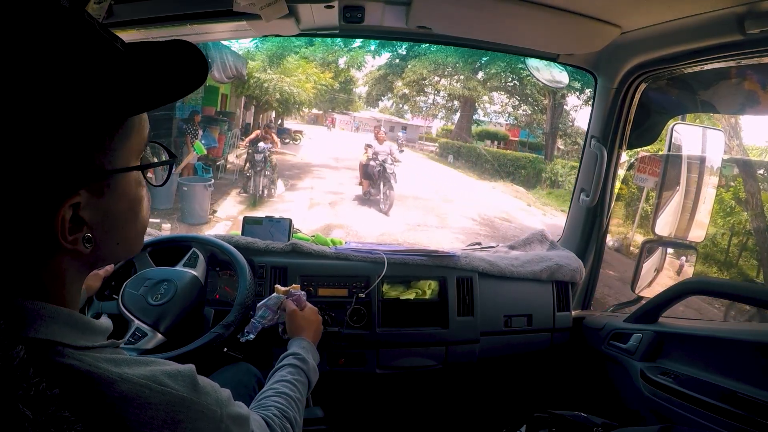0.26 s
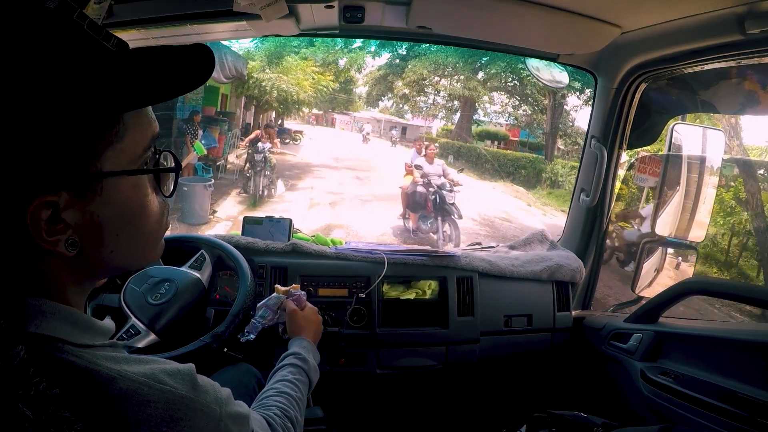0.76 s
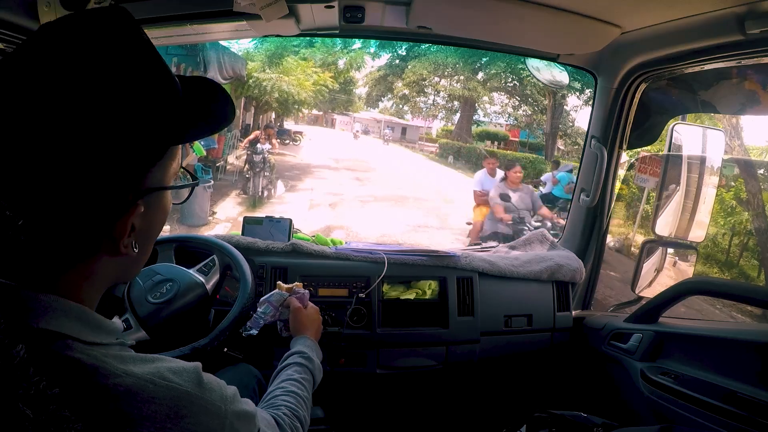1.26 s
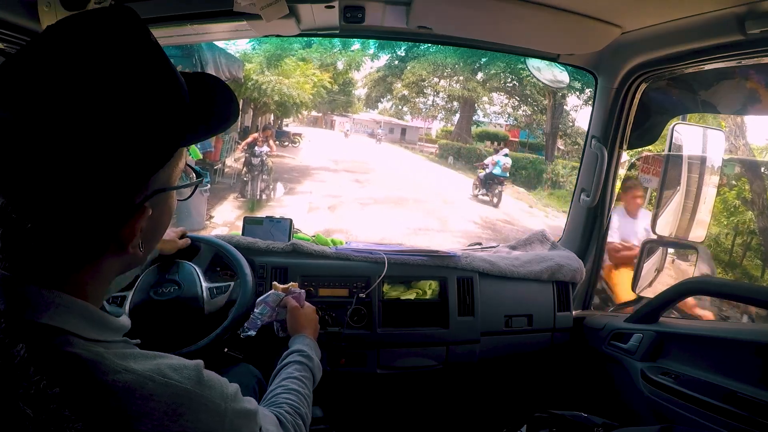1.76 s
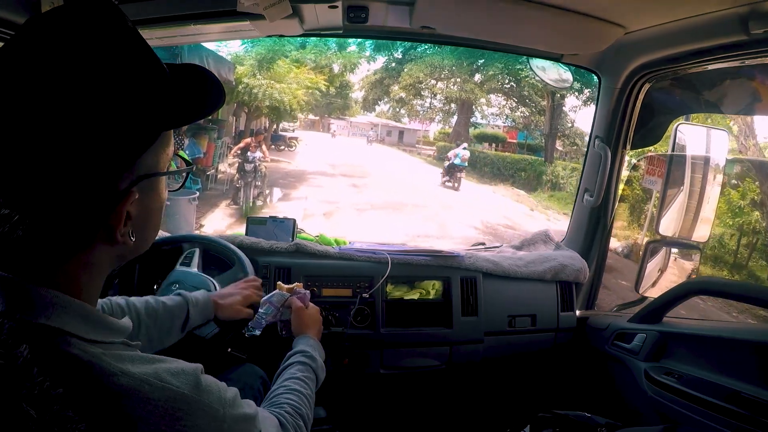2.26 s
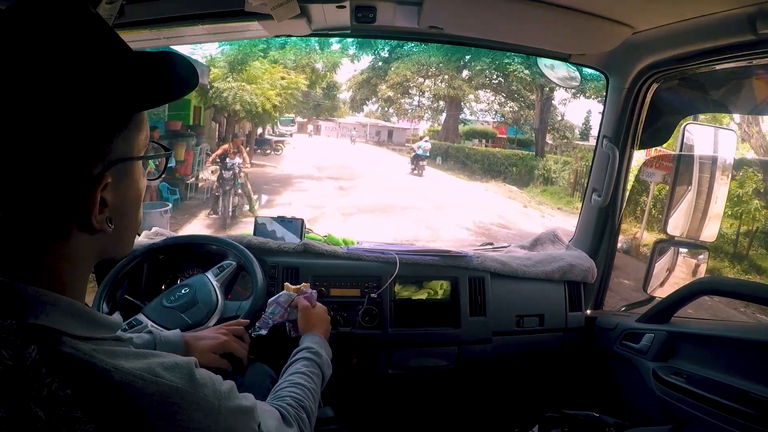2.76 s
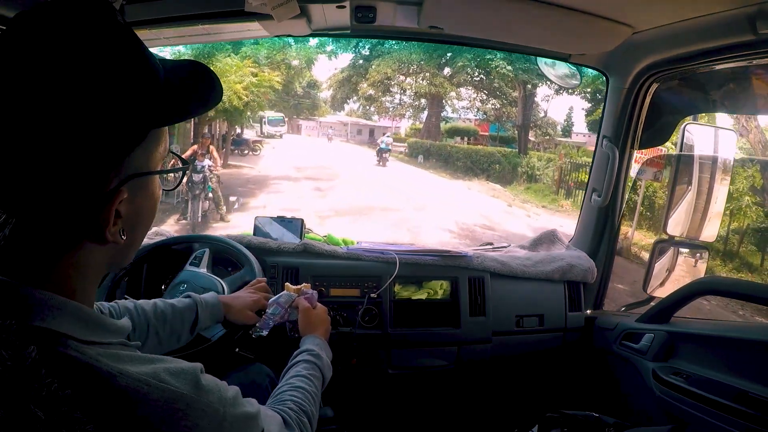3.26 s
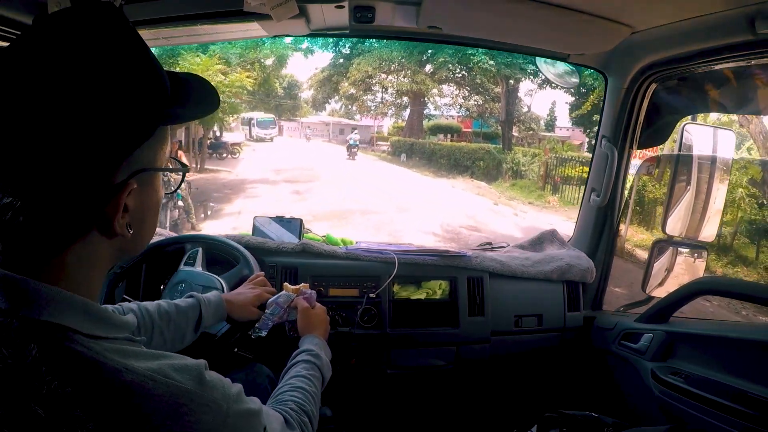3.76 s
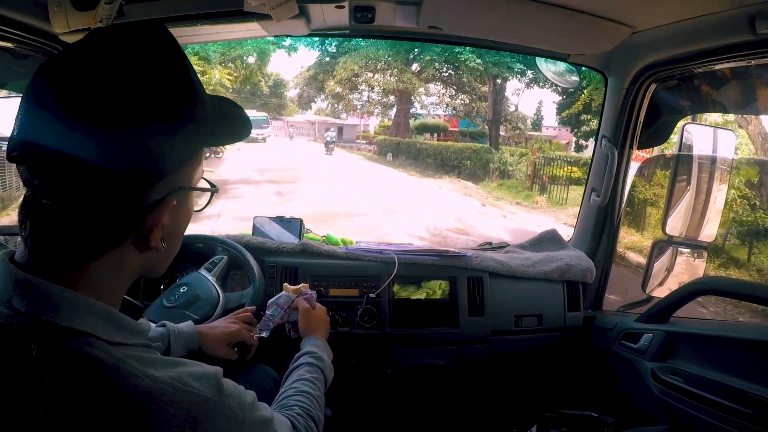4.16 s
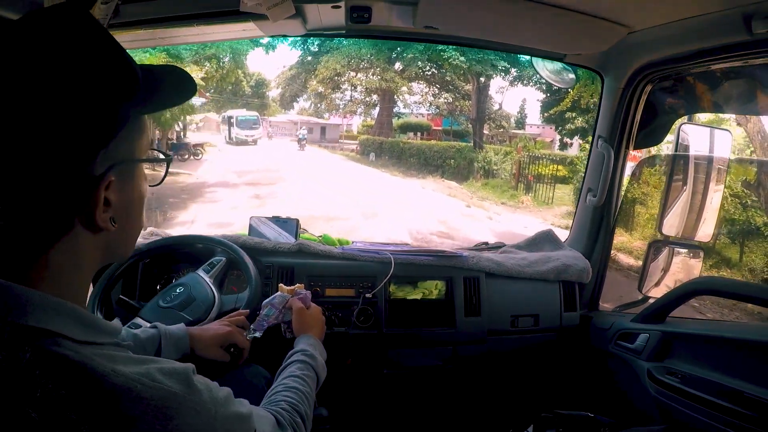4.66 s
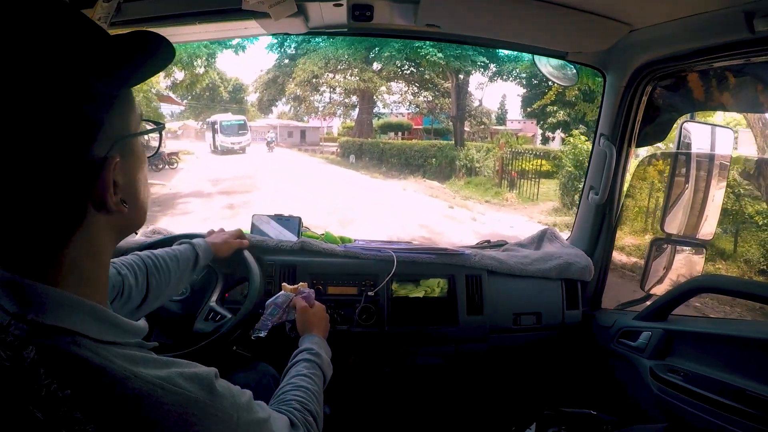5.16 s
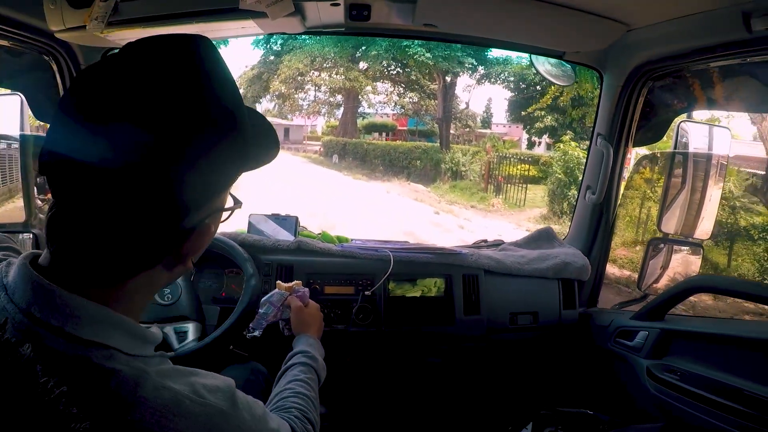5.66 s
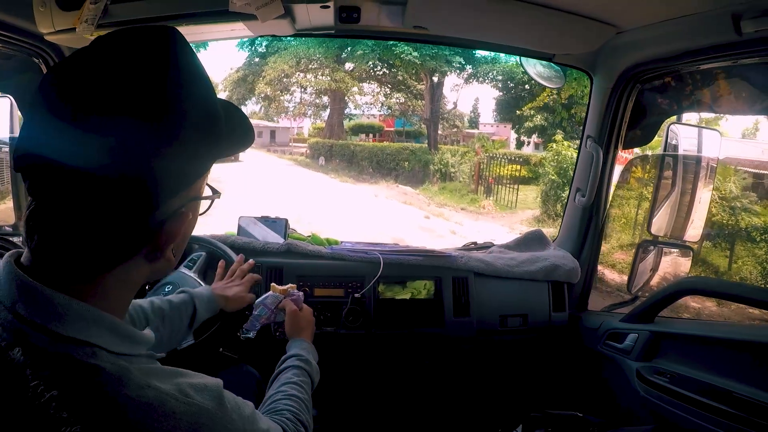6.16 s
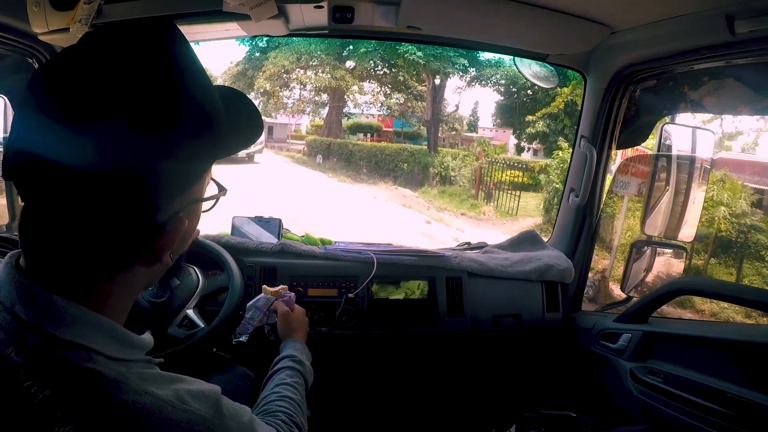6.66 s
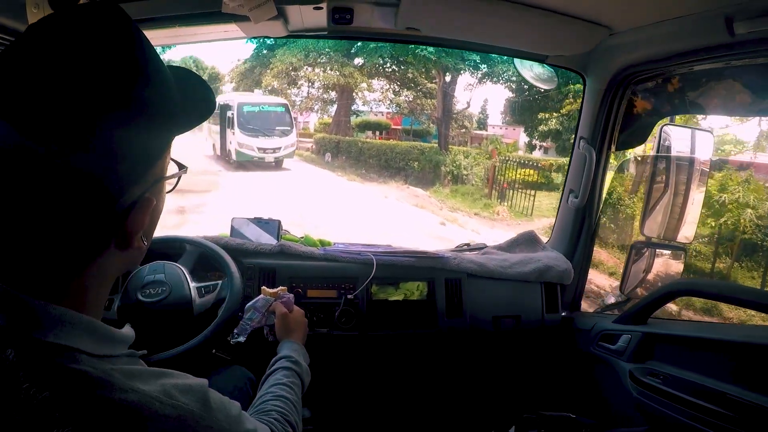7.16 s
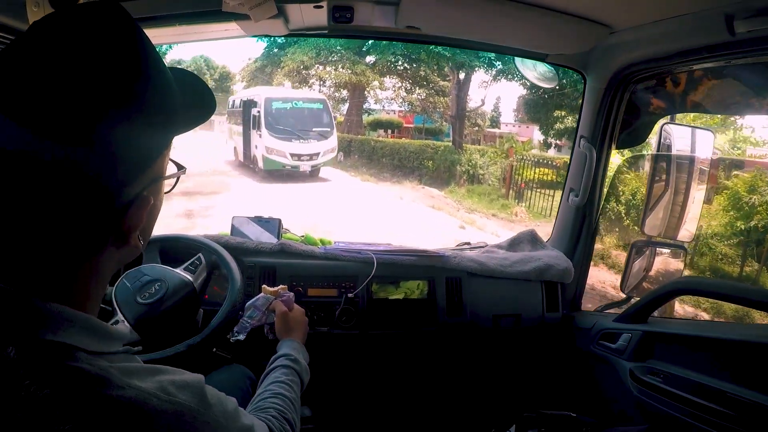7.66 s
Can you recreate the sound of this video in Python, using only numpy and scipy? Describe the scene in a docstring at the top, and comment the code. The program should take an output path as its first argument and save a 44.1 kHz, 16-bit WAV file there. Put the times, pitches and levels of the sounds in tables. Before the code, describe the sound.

A diesel truck creeps over rough dirt, heard from within the cab. The engine runs steadily just above idle, its heavy low throb surging slightly as it pulls and easing as it coasts. Rumble, airy hum and tyre hiss surround it, the hum fading away. Bright dry rattles scatter through the first half, dull body thuds arrive mid-way, then a short rattle cluster; the last part is smoother, with a faint squeak at the end.

```python
"""A four-cylinder diesel engine just above idle booms in a truck cab as it creeps along a dirt road.
Firing orders are sines lifted by the cab; knock is clicks and clatter ringing the engine cover.
A whine and an airy hum sit on top, while shaped noise makes the road rumble and the tyre hiss.
Loose trim rattles in noise bursts, ruts set panels ringing, and a few thin tones squeak.
Two close microphone ports hear it all, partly alike and partly not, depending on pitch."""
import sys
import numpy as np
from scipy import signal
from scipy.fft import rfft, irfft, next_fast_len
from scipy.io import wavfile

SR = 44100
rng = np.random.default_rng(int(sys.argv[2]) if len(sys.argv) > 2 else 0)


def unload_audio(sound):
    """Save the sound as a 16-bit wav file, at the path given as the first command line argument."""
    columns = np.transpose(np.atleast_2d(sound))
    # keep every value between -1 and 1, then stretch to whole-number steps
    steps = np.round(np.clip(columns, -1, 1) * 32767)
    wavfile.write(sys.argv[1], SR, steps.astype(np.int16))


def field_ratio(decibels):
    """Amplitude ratio for a level in dB (20 dB per decade); scalars and array-likes work."""
    return 10 ** (np.asarray(decibels, dtype=float) / 20)


N = 349272  # length in samples


def rms_one(x):
    """Scale to unit rms."""
    return x / np.sqrt(np.mean(x ** 2) + 1e-20)


def in_time(rows):
    """Columns of a time curve, read at every sample."""
    s, *columns = np.transpose(rows)
    return [np.interp(np.arange(N) / SR, s, c) for c in columns]


def at_hz(rows, hz):
    """Columns of a spectrum, read at the given pitches on a log-frequency axis."""
    f, *columns = np.transpose(rows)
    return [np.interp(np.log(hz + 1), np.log(f), c) for c in columns]


def drift(rate):
    """Random wandering of rms 1: noise smoothed twice above rate (Hz), made at every 40th sample."""
    r = np.exp(-80 * np.pi * rate / SR)
    noise = rng.standard_normal(N // 40 + 2002)
    smooth = signal.lfilter([1], [1, -2 * r, r * r], noise)
    slow = rms_one(smooth[2000:])  # skip the filter's start
    return np.interp(np.arange(N) / 40, np.arange(len(slow)), slow)


def coloured(spectrum):
    """Two unrelated noises with the given spectrum, rms 1."""
    gain = field_ratio(at_hz(spectrum, np.fft.rfftfreq(N, 1 / SR))[0])
    noise = rng.standard_normal((2, N))
    return rms_one(irfft(rfft(noise) * gain, N))


def resonate(x, modes):
    """Parallel two-pole resonances, signs alternating."""
    out = 0
    for k, (hz, width, db) in enumerate(modes):
        r = np.exp(-np.pi * width / SR)
        top = [(1 - r * r) / 2, 0, (r * r - 1) / 2]
        bottom = [1, -2 * r * np.cos(2 * np.pi * hz / SR), r * r]
        out = out + (-1) ** k * field_ratio(db) * signal.lfilter(top, bottom, x)
    return out


def ring(pushes, modes):
    """Pushes set every mode ringing; each mode dies away by 60 dB in its own time."""
    out = 0
    for hz, db, t60 in modes:
        r, w = field_ratio(-60 / (t60 * SR)), 2 * np.pi * hz / SR
        bottom = [1, -2 * r * np.cos(w), r * r]
        out = out + field_ratio(db) * signal.lfilter([0, np.sin(w)], bottom, pushes + 1e-18)
    return out


# Engine speed, surging as the wheels climb ruts. Each row: time in seconds, firings per second.
SPEED = [(0, 24.9), (.76, 25), (.97, 26.8), (1.22, 24.6), (1.42, 27.2), (1.9, 26.8), (2.12, 25.8),
         (2.28, 27.1), (2.45, 25.8), (3.74, 25.0), (3.95, 28.8), (4.35, 29.5), (4.55, 29), (4.72, 27.3),
         (4.95, 28.1), (5.5, 26.8), (6.42, 26.6), (6.62, 29.7), (6.8, 27.9), (7.0, 28.3), (7.14, 27.4),
         (7.7, 26.5), (7.92, 28.4)]
# Engine load, coasting or pulling. Each row: time in seconds, load against its mean in dB.
LOAD = [(0, 0.5), (.7, -3.5), (.92, 3.5), (1.15, 1.5), (1.4, 3.5), (2.8, 1), (2.98, -8), (3.7, -0.5),
        (4.0, -1), (4.7, 0.5), (5.3, -1), (6.1, -1.5), (6.7, 4), (7.4, -4), (7.92, 3)]


def engine_pace():
    """Firing rate, firings counted so far, and load; all engine sounds follow these."""
    per_s = in_time(SPEED)[0]
    turns = np.cumsum(per_s) / SR
    return per_s, turns, in_time(LOAD)[0]


# How strongly cab air and panels boom with a firing order at each pitch.
# Each row: pitch in Hz, rms level in dB before load and wavering.
CAB_BOOM = [(24.5, -21), (27, -24), (29, -18.5), (33, -21), (49, -29), (52, -18.5), (60, -18), (70, -28),
            (75, -25), (81, -34), (100, -37), (107, -28.5), (118, -27.5), (127, -37), (137, -34),
            (150, -32), (160, -40), (175, -37), (190, -38), (205, -45), (218, -48), (226, -41), (241, -34),
            (252, -35), (260, -42), (268, -48), (280, -56), (300, -58)]


def boom(per_s, turns, load_db, count=12):
    """Clean multiples of the firing rate, each wavering, lifted by the cab; the second follows load most."""
    orders_follow = 0.51  # share of the load's swing; the second order takes all of it
    first_wander = .08  # turns; the body rocks and blurs the lowest order
    out = 0
    for k in range(1, count):
        follows = 1 if k == 2 else orders_follow
        level_db = at_hz(CAB_BOOM, k * per_s)[0] + follows * load_db + 1.4 * drift(1.8)
        wander = (k == 1) * first_wander * drift(2.3)
        phase = 2 * np.pi * (k * turns + rng.random() + wander)
        out = out + np.sqrt(2) * field_ratio(level_db) * np.array([np.sin(phase), np.cos(phase)])
    return out


# Engine cover and dash resonances rung by the knock.
# Each row: pitch in Hz, width in Hz, strength in dB.
COVER_MODES = [(845, 28.5, -7), (1050, 242, -7.5), (1222, 75, -2.5), (1370, 7, -8), (1734, 264, -18),
               (1990, 65, -11.5), (2195, 36, -15), (3290, 230, -27)]


def knock(turns, load_db, rough=.9):
    """One click per firing, uneven by cylinder, and clatter that sags within the cycle, ring the cover."""
    mean_db, load_share = -36.5, 0.6
    fired = np.flatnonzero(np.diff(np.floor(turns)) > 0)
    by_cylinder = np.array([-0.5, -5.0, 0.0, -3.0])[np.arange(len(fired)) % 4]  # dB
    chance_db = 2.0 * rng.standard_normal((len(fired), 2)).T
    clicks = np.zeros((2, N))
    clicks[:, fired] = field_ratio(by_cylinder + chance_db)
    gate = .5 + 0.61 * np.exp(-(turns % 1) / .5)
    clatter = rms_one(gate * rng.standard_normal((2, N)))
    drive = np.sqrt(1 - rough) * rms_one(clicks) + np.sqrt(rough) * clatter
    firewall = signal.butter(4, 780, "high", fs=SR, output="sos")
    heard = signal.sosfilt(firewall, resonate(drive, COVER_MODES))
    return field_ratio(mean_db + load_share * load_db) * rms_one(heard)


# The sharp cover resonance that sings the high orders, wandering in pitch and strength.
# Each row: time in seconds, pitch in Hz, level in dB before the throb.
WHINE = [(0, 1180, -40), (.7, 1177, -38.5), (.88, 1225, -33), (1.2, 1193, -38), (1.5, 1225, -38.5),
         (2.3, 1220, -33), (2.6, 1202, -40.5), (3.7, 1177, -38), (4.0, 1210, -34), (4.8, 1218, -40.5),
         (5.3, 1231, -37), (6.3, 1230, -35), (6.6, 1245, -34), (7.0, 1215, -36.5), (7.92, 1236, -35.5)]


def whine(per_s, turns):
    """High firing orders lifted where they cross the wandering resonance, with narrow noise riding on it."""
    width_hz = 50
    breath_db = -6  # the noisy part against the clean orders
    throb_depth = 0.27  # pulse at the firing rate
    hz, level_db = in_time(WHINE)
    orders = 0
    for k in range(41, 50):  # multiples of the firing rate that fall near the resonance
        phase = 2 * np.pi * (k * turns + rng.random() + .06 * drift(3.6))
        lift = 1 / (1 + (2 * (k * per_s - hz) / width_hz) ** 2)
        orders = orders + lift * field_ratio(2.2 * drift(2.0)) * np.array([np.sin(phase), np.cos(phase)])
    phase = 2 * np.pi * np.cumsum(hz) / SR
    breath = np.array([drift(width_hz / 2) * np.sin(phase) + drift(width_hz / 2) * np.cos(phase)
                       for path in range(2)])
    tone = rms_one(rms_one(orders) + field_ratio(breath_db) * breath)
    throb = 1 + throb_depth * np.cos(2 * np.pi * turns)
    return field_ratio(level_db) * throb * tone


# Colour of the road rumble. Each row: pitch in Hz, relative strength in dB per Hz.
RUMBLE = [(15, -17), (24, -4), (33, -4.5), (42, -1), (54, -6.5), (65, -5), (80, -10), (95, -19.5),
          (125, -12.5), (150, -18.5), (175, -13.5), (200, -18.5), (225, -28.5), (260, -25), (285, -32),
          (310, -35.5), (450, -41.5), (650, -45.5), (1400, -41), (3000, -75)]
# How rough the road is under the wheels. Each row: time in seconds, change of rumble level in dB.
ROUGHNESS = [(0, -1.5), (.3, -0.5), (.8, -2), (1.2, -1), (2, -1), (2.7, 0), (3.2, -0.5), (3.8, 1),
             (4.5, 0.5), (5.2, -1), (5.8, 0), (6.5, 1), (7.1, -1), (7.92, 0.5)]


def rumble():
    """Low noise through the frame, rising and falling with the road's roughness."""
    level_db = -17 + in_time(ROUGHNESS)[0] + 1.35 * drift(4.8)
    return field_ratio(level_db) * coloured(RUMBLE)


# Colour of the tyre hiss. Each row: pitch in Hz, relative strength in dB per Hz.
HISS = [(250, -48), (450, 16), (650, 6), (850, 16.5), (1500, 13.5), (2500, 6.5), (3400, 2.5), (3800, -0.5),
        (4800, -1), (6300, 3.5), (7600, 4), (8700, -4), (10000, -6.5), (12000, -18.5), (14200, -34),
        (15000, -62)]
# The hiss swells and fades again, as when traffic passes close.
# Each row: centre in seconds, half length in seconds, rise in dB.
SWELLS = [(0.457, 0.21, 8), (1.957, 0.76, 2), (4.14, 0.4, 3.5), (6.546, 0.63, 3), (7.86, 0.18, 4.5)]


def hiss(turns):
    """Tyre noise that flickers, throbs faintly with the engine and swells most in its treble."""
    start_db, fall_db_per_s, settles_s = -36.5, 1.44, 4.53
    bright_hz, dull_share = 5000, .35  # below this pitch the hiss takes only a share of each swell
    t = np.arange(N) / SR
    # the hiss sinks as the surface softens, then holds
    level_db = start_db - fall_db_per_s * np.minimum(t, settles_s) + 0.91 * drift(6.9)
    swell_db = sum(db * np.exp(-((t - s) / half_s) ** 2) for s, half_s, db in SWELLS)
    throb = 1 + 0.07 * np.cos(2 * np.pi * turns)
    noise = coloured(HISS)
    dull = signal.sosfiltfilt(signal.butter(2, bright_hz, fs=SR, output="sos"), noise)
    swelling = field_ratio(swell_db) * (noise - dull) + field_ratio(dull_share * swell_db) * dull
    return field_ratio(level_db) * throb * swelling


# Two broad resonances of the airy hum. Each row: pitch in Hz, width in Hz, strength in dB.
AIRY_HUM = [(1592, 180, -4.5), (1854, 144, 7)]


def airy_hum():
    """Noise through broad resonances, each path applied twice, flickering and fading as the truck moves on."""
    start_db, fall_db_per_s = -44, 3
    noise = resonate(resonate(rng.standard_normal((2, N)), AIRY_HUM), AIRY_HUM)
    level_db = start_db - fall_db_per_s * np.arange(N) / SR + 2.7 * drift(15.0)
    return field_ratio(level_db) * rms_one(noise)


# Colour of the rattling trim. Each row: pitch in Hz, relative strength in dB per Hz.
RATTLE = [(800, -15), (1600, 1), (2400, -8), (2950, -8.5), (3450, 0), (4000, -7.5), (4800, -7.5),
          (6500, -3.5), (8000, -2.5), (10000, -16), (13000, -29), (14300, -36), (15000, -54.5)]
# Loose trim rattling. Each row: start in seconds, strength in dB, time to fall 60 dB in seconds,
# extra weight of the part below 4.5 kHz in dB.
RATTLES = [(.056, -22.5, 0.06, 6), (.572, -37, 0.032, 3), (.915, -32, 0.1, -4.5), (1.788, -10.5, 0.046, 0),
           (2.164, -17, 0.06, -3), (2.395, -30, 0.055, -17), (2.831, -28.5, 0.054, -31),
           (3.135, -31, 0.069, -17), (3.414, -33, 0.14, 1.5), (3.61, -28, 0.1, -6),
           (3.762, -31, 0.052, -13), (3.878, -30.5, 0.047, -5), (4.417, -30.5, 0.2, -5),
           (4.62, -27, 0.031, -18), (4.647, -46, 0.024, -7), (5.213, -34, 0.091, 10),
           (5.219, -24, 0.088, -5.5), (5.232, -22, 0.053, 3), (5.257, -33, 0.13, 7),
           (5.28, -35.5, 0.044, -3), (5.296, -39, 0.043, 2), (5.315, -48, 0.08, 3),
           (7.198, -25, 0.033, -22)]


def rattles():
    """Short bursts of bright noise with a fast rise and a grainy tail."""
    t, bright, low = np.arange(N) / SR, np.zeros(N), np.zeros(N)
    for s, db, t60, low_db in RATTLES:
        at = round(s * SR)
        age = np.clip(t[at:round((s + .5) * SR)] - s, 0, None)
        rise = 1 - np.exp(-age / .0045)
        burst = field_ratio(db - 60 * age / t60) * rise
        bright[at:][:len(age)] += burst
        low[at:][:len(age)] += burst * field_ratio(low_db)
    noise = field_ratio(2.2 * drift(160)) * coloured(RATTLE)  # many small contacts make the burst grainy
    dull = signal.sosfiltfilt(signal.butter(4, 4500, fs=SR, output="sos"), noise)
    return bright * (noise - dull) + low * dull


# Body thuds over ruts. Each row: time in seconds, floor shove in dB, low slap in dB, bright slap in dB.
THUDS = [(.056, -40, -30, -45), (3.39, -18, -45, -45), (3.409, -10, -26, -26), (3.44, -15, -38, -33),
         (3.585, -16, -40, -45), (3.605, -10, -29, -32), (3.632, -22, -40, -34), (4.392, -15, -45, -45),
         (4.409, -13, -23, -20), (4.42, -30, -25, -21), (4.45, -20, -33, -31), (4.466, -12, -39, -35),
         (4.645, -30, -37, -33), (7.882, -18, -36, -47)]
# Modes of the floor pan and panel, then of the lower panels, then of the dash.
# Each row of all three: pitch in Hz, strength in dB, time to fall 60 dB in seconds.
BODY = [(138, -3, .16), (168, 1.5, .18), (205, -9, .08)]
LOW_PANEL = [(300, -7, .045), (380, 0, .05), (450, -1, .045), (560, -4, .04)]
DASH_PANEL = [(680, -5, .035), (770, -4, .035), (880, 0, .035), (990, 0, .035), (1110, 3, .035),
              (1650, -7, .025)]


def thuds():
    """Each rut slaps the panels with a dying flurry of contacts; the floor pan gets a soft shove just after."""
    rise_s, t60_s, shove_delay_s = .004, .13, .02
    shove, low, bright = np.zeros(N), np.zeros((2, N + SR)), np.zeros((2, N + SR))
    age = np.arange(SR // 5) / SR
    fade = (1 - np.exp(-age / rise_s)) ** 2 * field_ratio(-60 * age / t60_s)
    for s, shove_db, low_db, bright_db in THUDS:
        at = round(s * SR)
        shove[at + round(shove_delay_s * SR):][:200] += field_ratio(shove_db) * np.hanning(200) / 80
        flurry = rng.standard_normal((len(age), 2)).T * fade / np.sqrt(np.sum(fade ** 2))
        low[:, at:at + len(age)] += field_ratio(low_db) * flurry
        bright[:, at:at + len(age)] += field_ratio(bright_db) * flurry
    return ring(shove, BODY) + ring(low[:, :N], LOW_PANEL) + ring(bright[:, :N], DASH_PANEL)


# Faint squeaks. Each row: time of the peak in seconds, pitch in Hz, peak level in dB.
SQUEAKS = [(.515, 2750, -48), (.555, 2980, -47), (.572, 3950, -46), (7.838, 5500, -47),
           (7.872, 5520, -47.5), (7.905, 5150, -51)]


def squeaks():
    """Short thin tones that swell and fade."""
    t, half_s = np.arange(N) / SR, .007
    out = 0
    for s, hz, db in SQUEAKS:
        swell = np.exp(-((t - s) / half_s) ** 2)
        out = out + field_ratio(db) * swell * np.sin(2 * np.pi * hz * t)
    return out


# How the two ports compare. Each row: pitch in Hz, likeness from 0 to 1,
# how far the right leads in radians, left over right in dB.
PORTS = [(20, .97, .12, -2.5), (55, .92, .1, -2.5), (105, .3, .8, -4.5), (170, .82, 0, 0),
         (215, .7, -.4, -2), (245, .85, -.5, -8), (275, .7, -.3, -5), (330, .4, .5, 0), (480, .15, -2.3, 1),
         (640, .6, -3, 0), (780, .15, -3.5, -2), (870, .7, -2, -5), (1000, .7, -2.9, 2),
         (1220, .98, -3.3, 4), (1370, .9, -3.2, 3), (1600, .7, -2.5, 4), (1950, .6, -3.1, 4),
         (2200, .85, -3.9, 0), (2450, .1, -5.5, 0), (3300, .65, -6.2, 0), (4500, .6, -6.6, 0),
         (5200, .2, -6.1, 0), (7500, .3, -5, -1), (10000, .4, -3.2, -2), (12000, .7, -1.8, -1)]


def ports(paths):
    """Left hears the first path; right a phase-shifted copy mixed with the second path."""
    size = next_fast_len(N + SR // 2)
    alike, lead, balance_db = at_hz(PORTS, np.fft.rfftfreq(size, 1 / SR))
    shared, own = rfft(np.pad(paths, [(0, 0), (0, size - N)], "reflect"))
    right = alike * shared * np.exp(1j * lead) + np.sqrt(1 - alike ** 2) * own
    both = np.array([shared * field_ratio(balance_db / 2), right * field_ratio(-balance_db / 2)])
    return irfft(both, size)[:, :N]


def scene():
    """All sources as heard at the two ports."""
    per_s, turns, load_db = engine_pace()
    engine = boom(per_s, turns, load_db) + knock(turns, load_db) + whine(per_s, turns)
    road = rumble() + hiss(turns)
    return ports(engine + road + airy_hum() + rattles() + thuds() + squeaks())


def roll_off(x):
    """The treble ends steeply here."""
    return signal.sosfilt(signal.butter(12, 14000, fs=SR, output="sos"), x)


def record(dry):
    """Loud peaks are rounded off softly toward a ceiling of 0.9."""
    mix = .9 * np.tanh(dry / .9)
    return roll_off(mix)


dry = scene()
out = record(dry)
unload_audio(out)
```